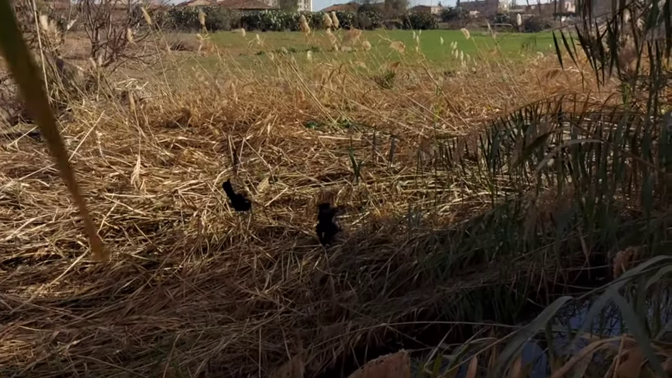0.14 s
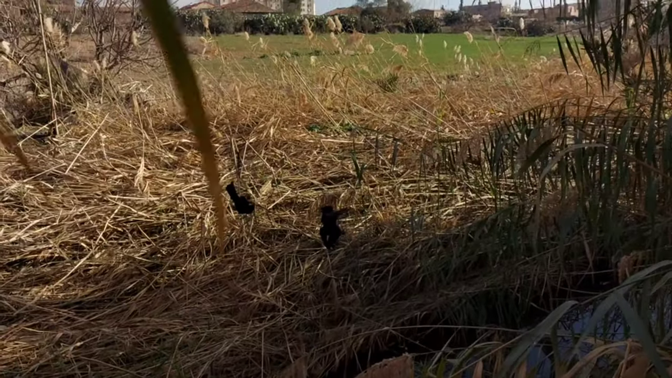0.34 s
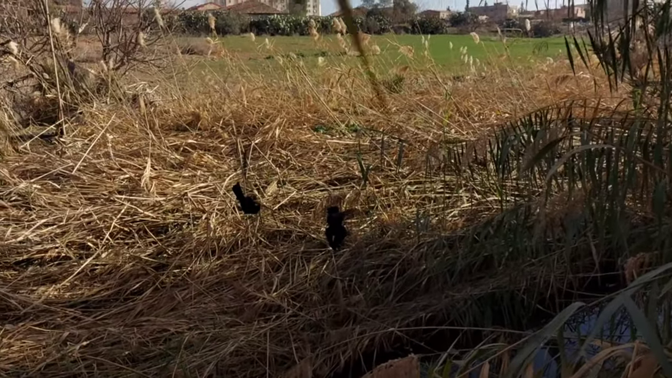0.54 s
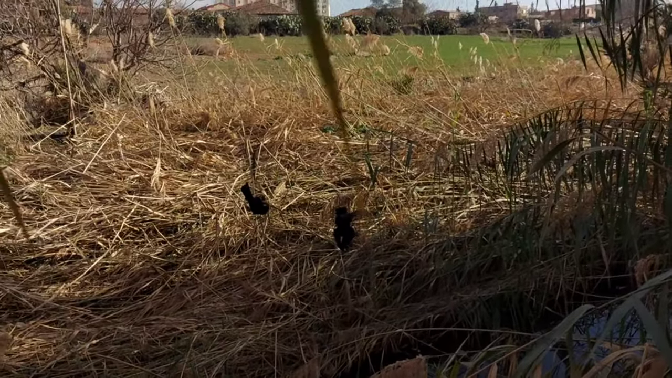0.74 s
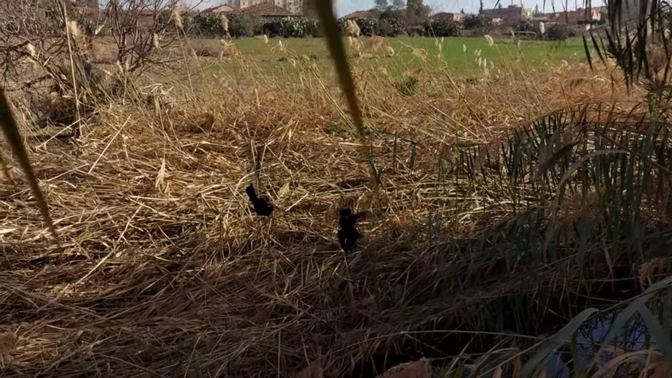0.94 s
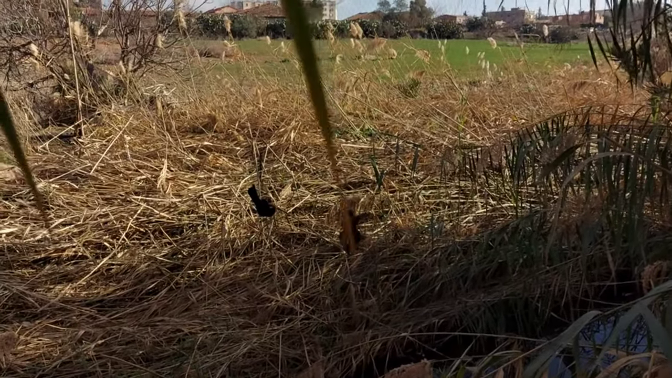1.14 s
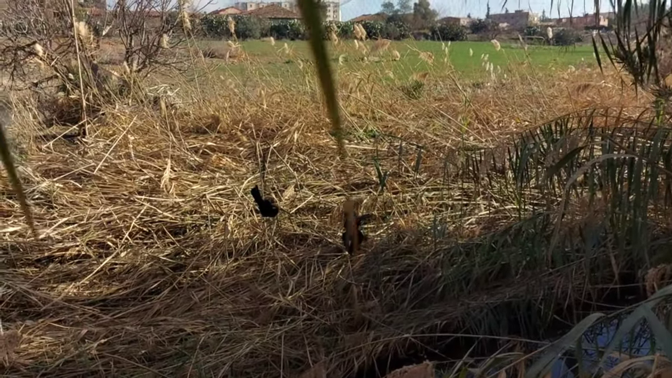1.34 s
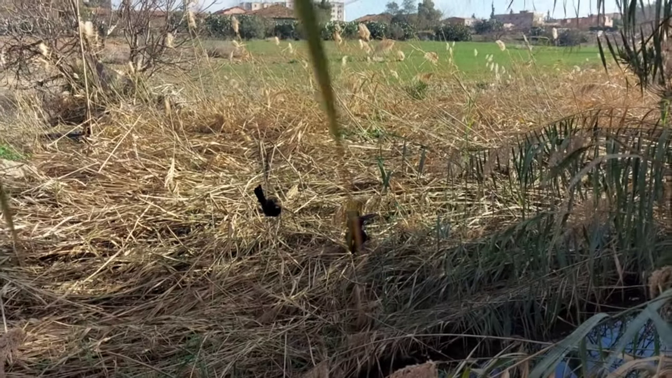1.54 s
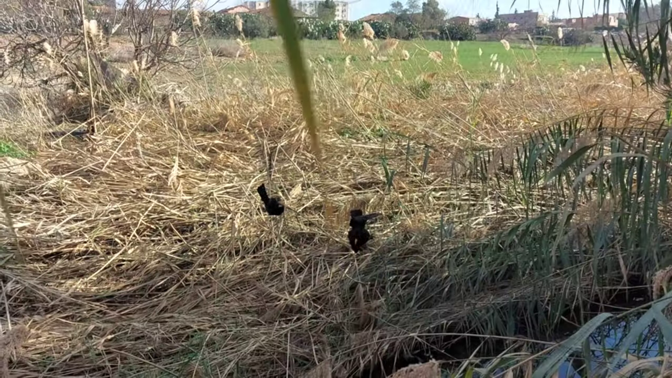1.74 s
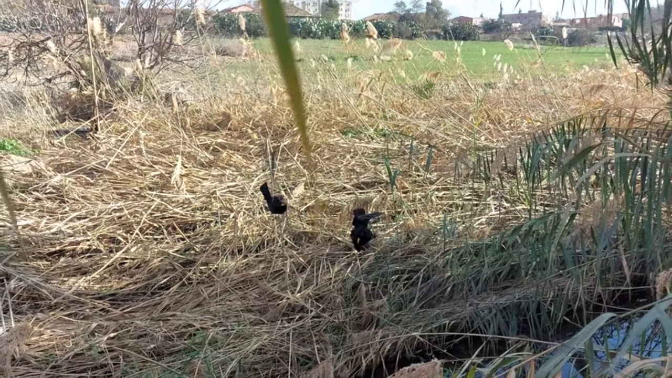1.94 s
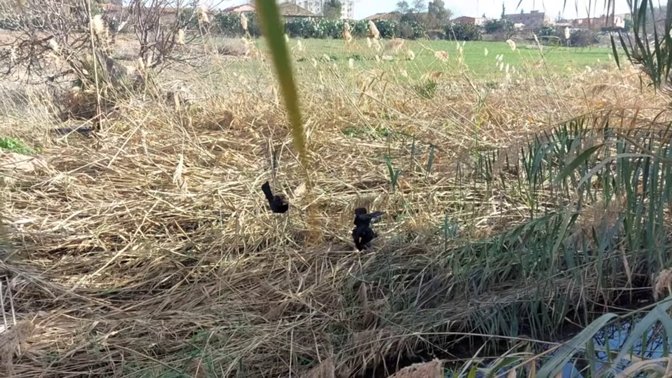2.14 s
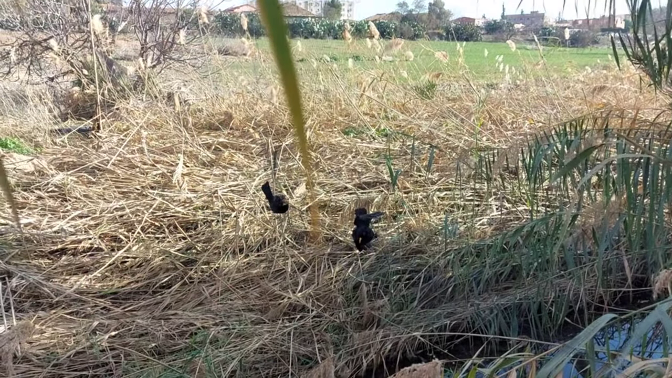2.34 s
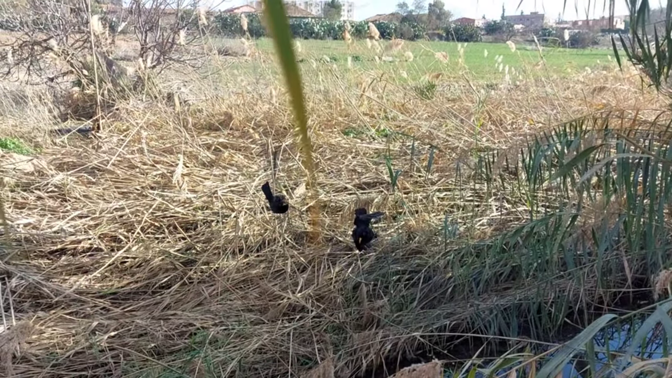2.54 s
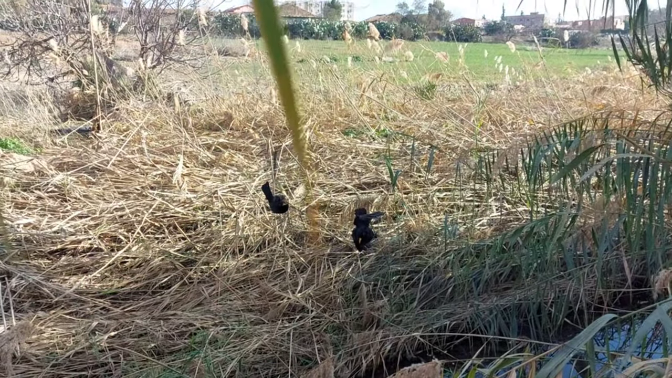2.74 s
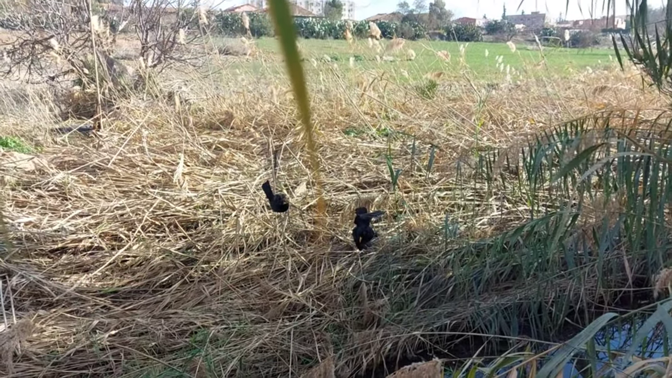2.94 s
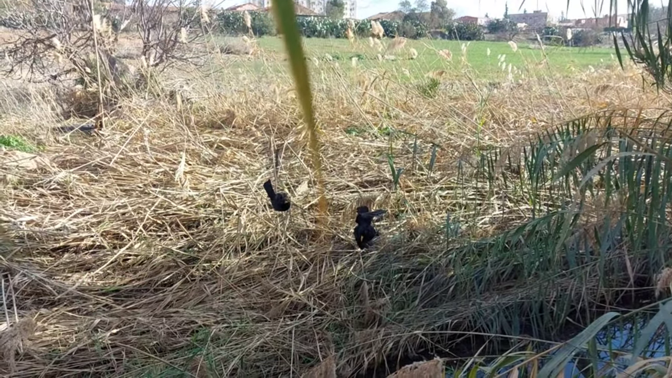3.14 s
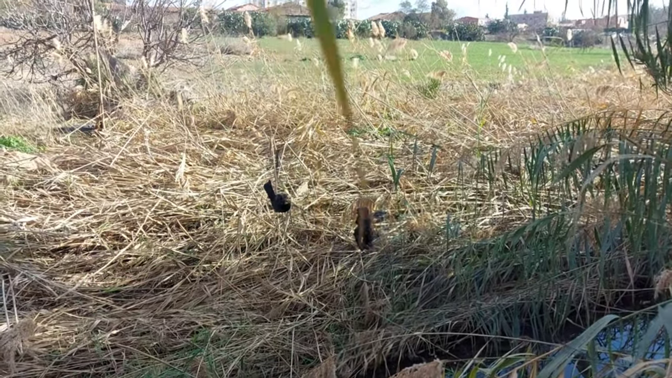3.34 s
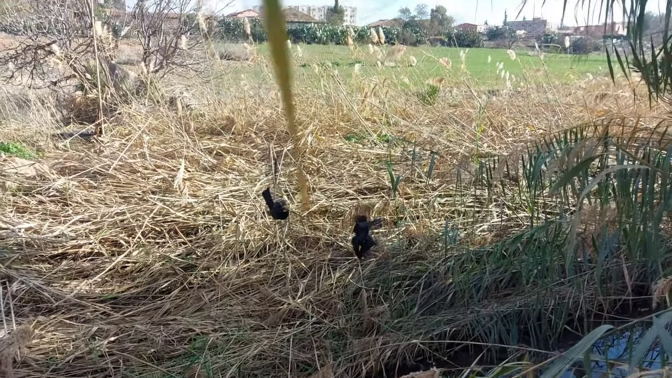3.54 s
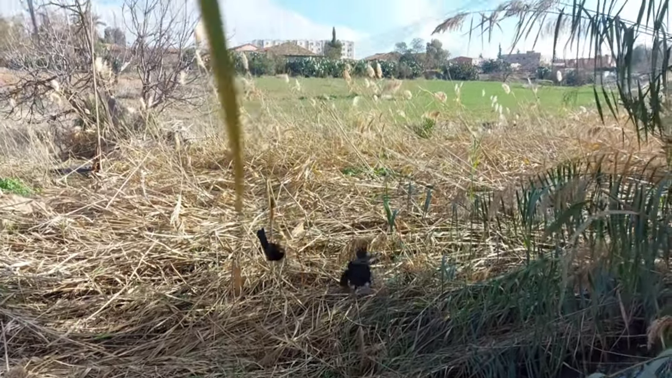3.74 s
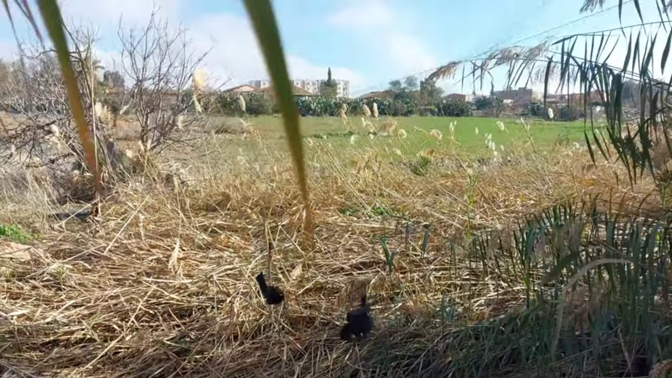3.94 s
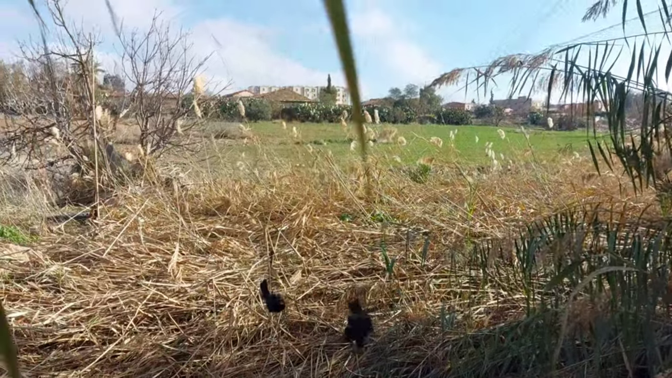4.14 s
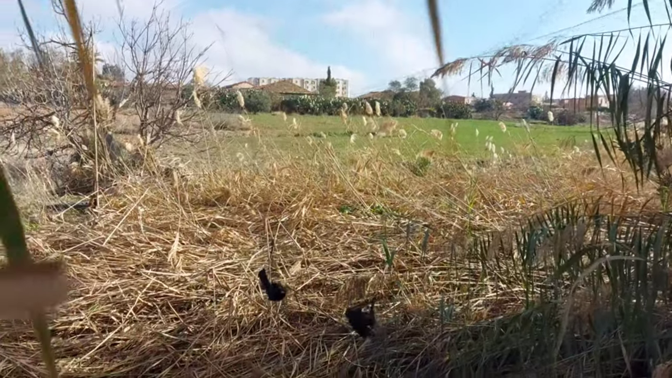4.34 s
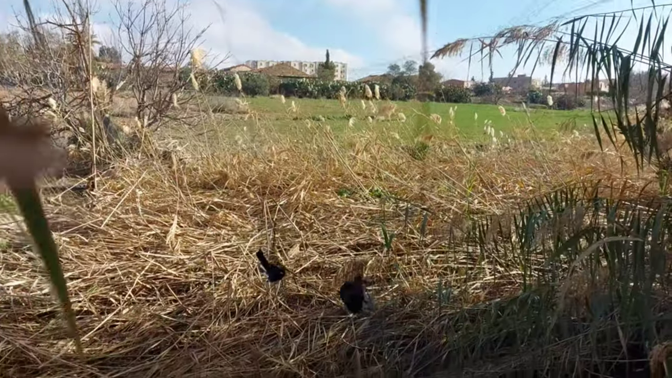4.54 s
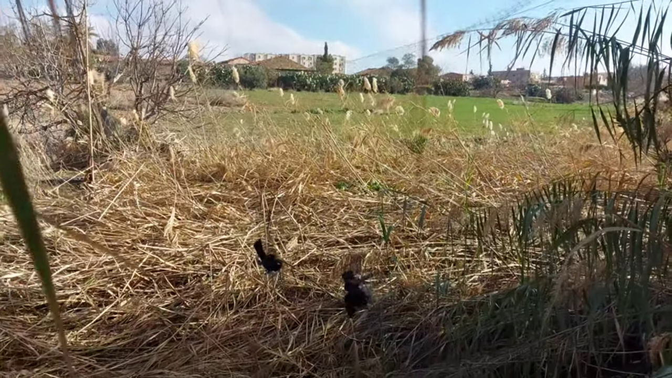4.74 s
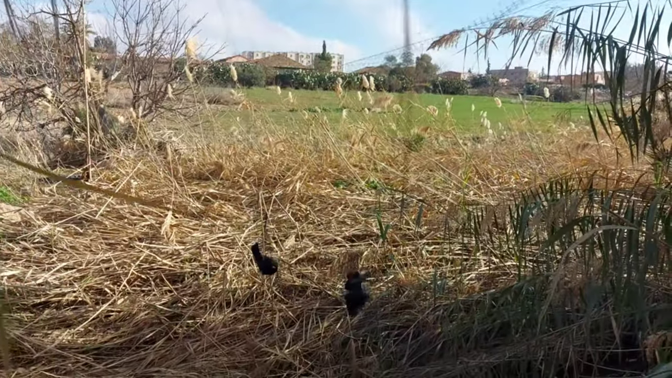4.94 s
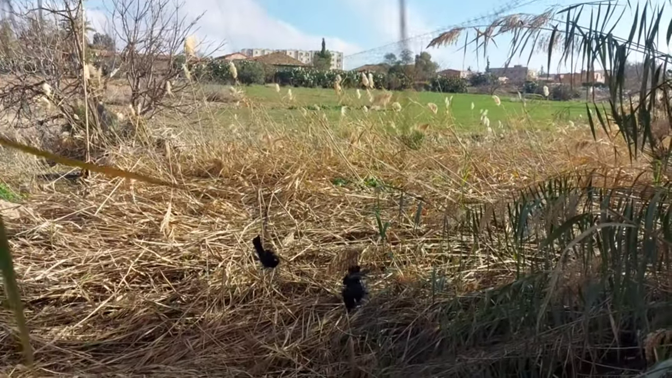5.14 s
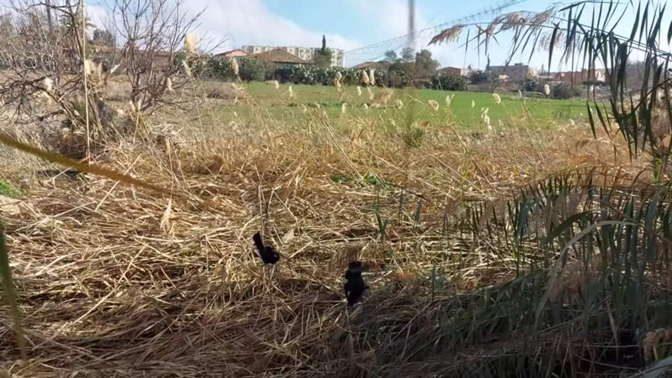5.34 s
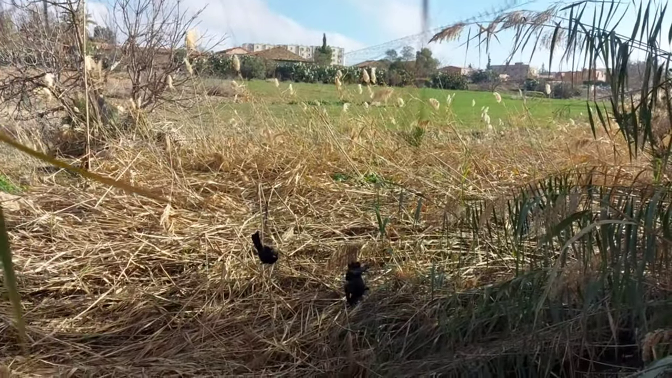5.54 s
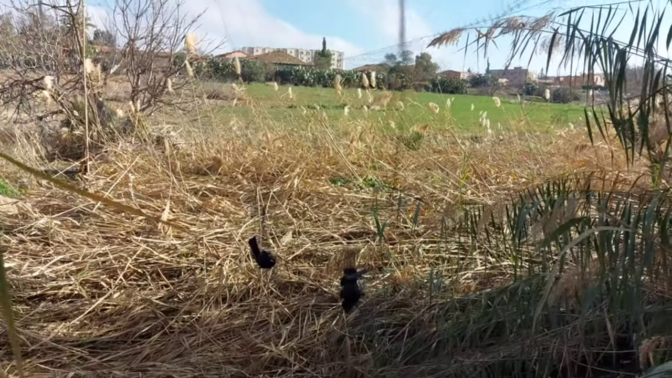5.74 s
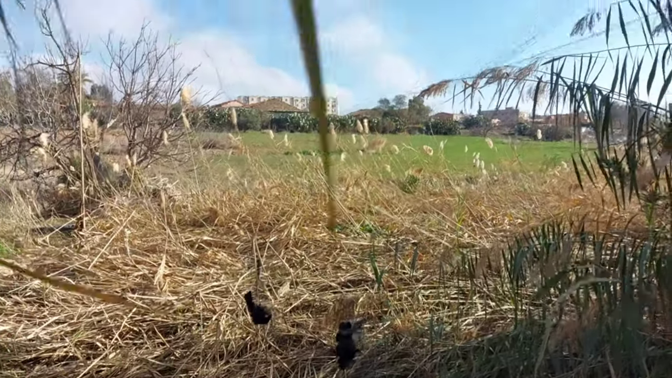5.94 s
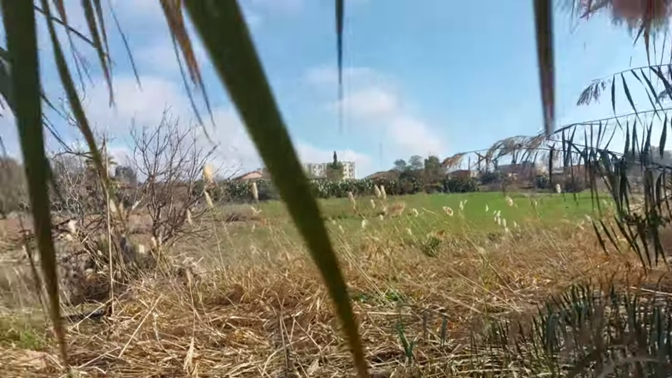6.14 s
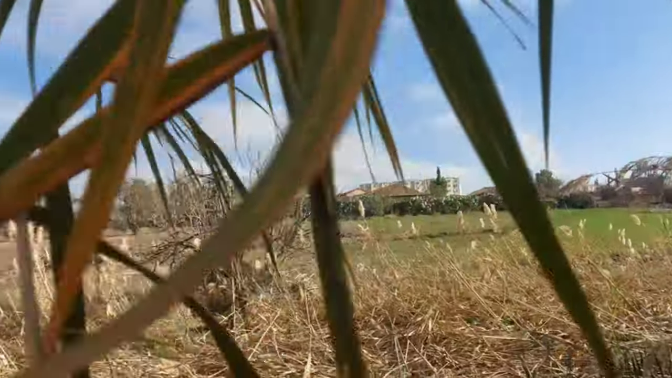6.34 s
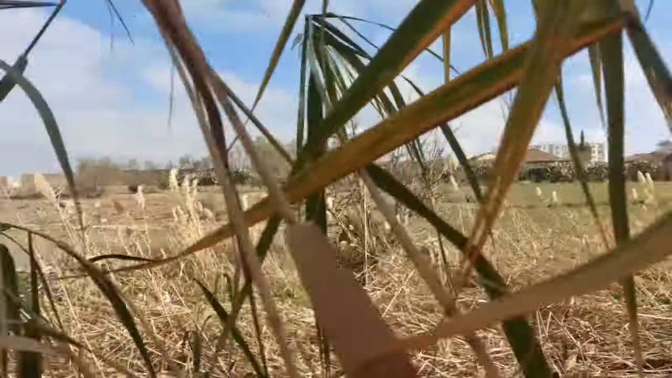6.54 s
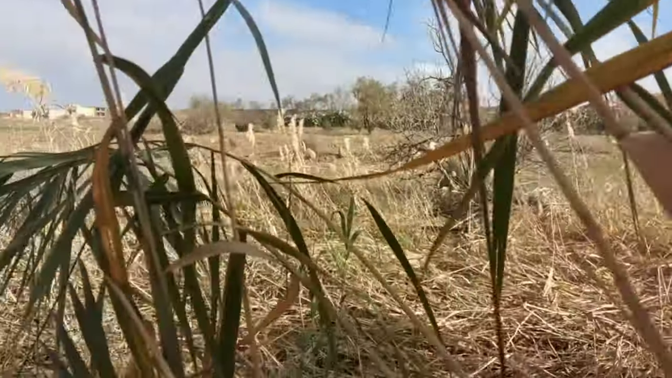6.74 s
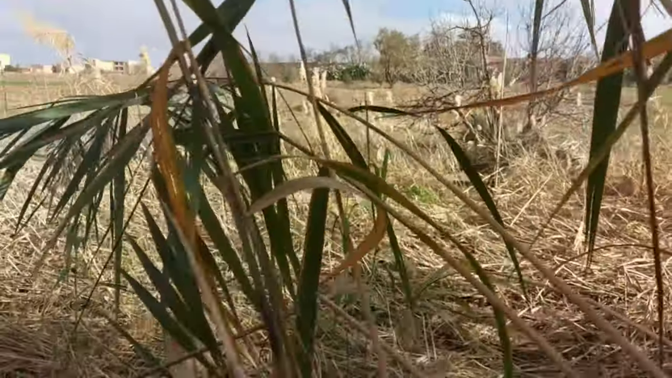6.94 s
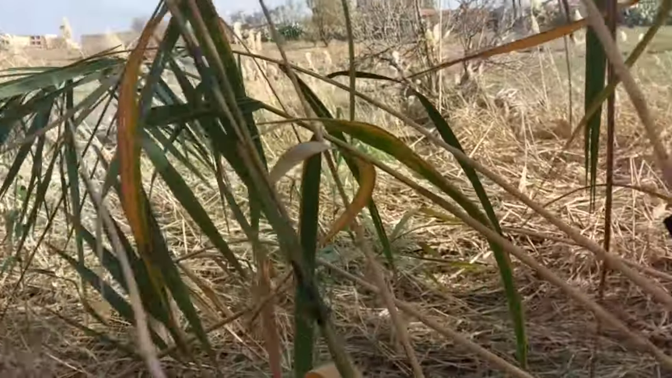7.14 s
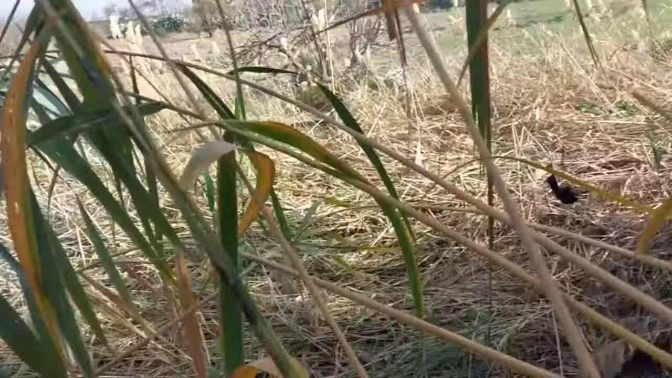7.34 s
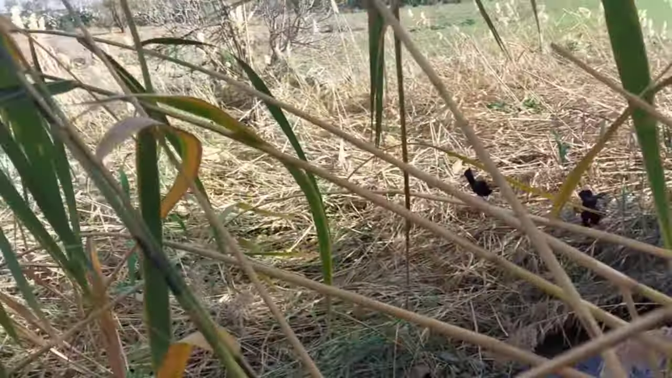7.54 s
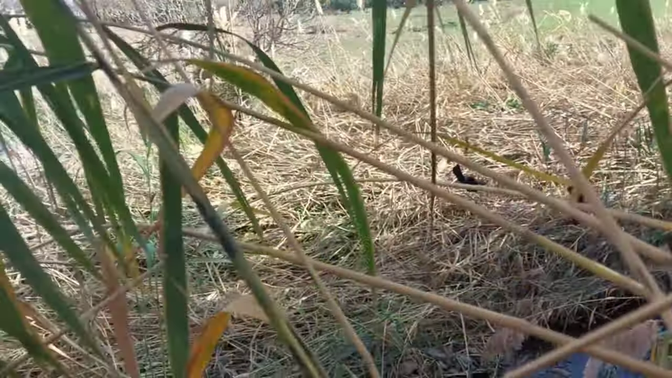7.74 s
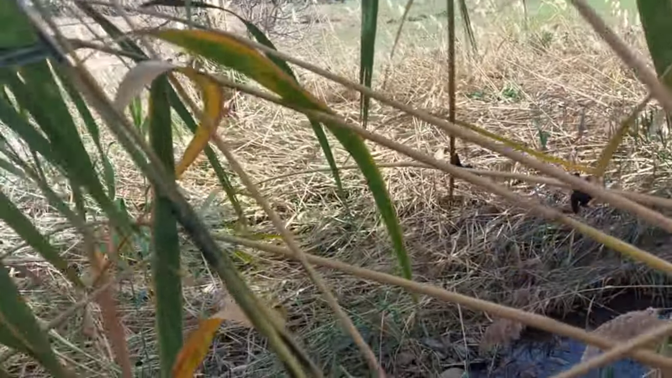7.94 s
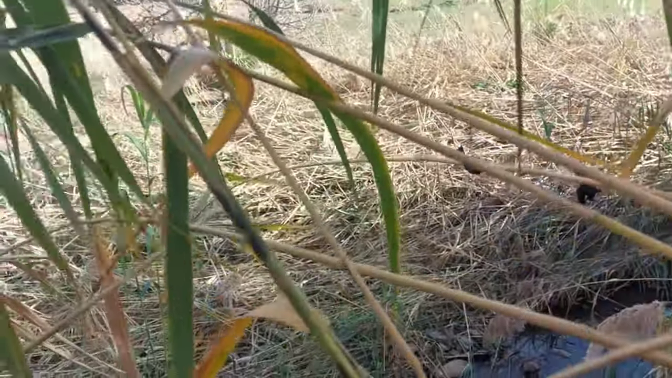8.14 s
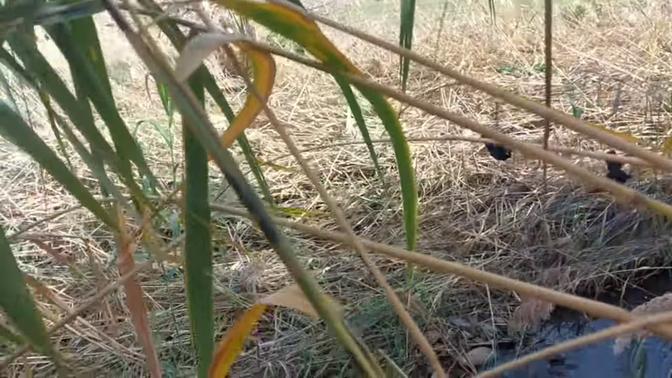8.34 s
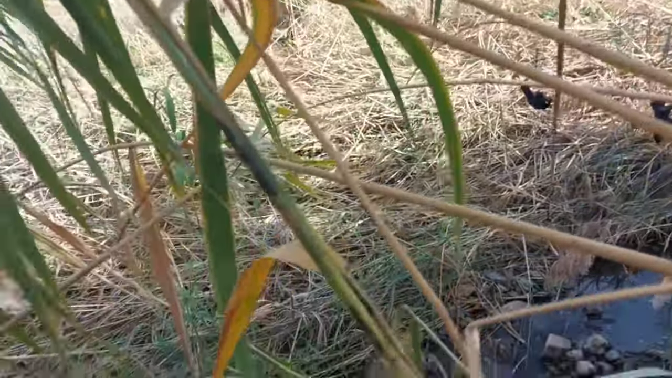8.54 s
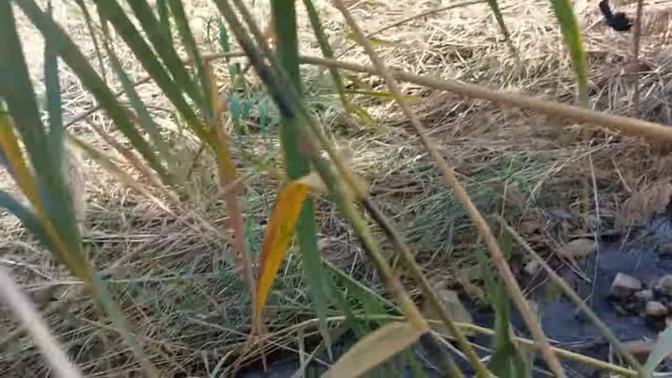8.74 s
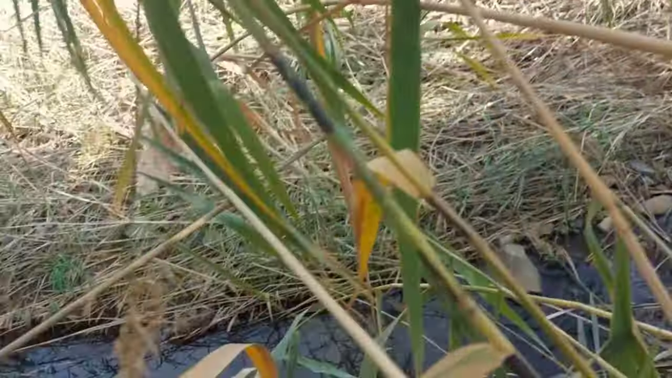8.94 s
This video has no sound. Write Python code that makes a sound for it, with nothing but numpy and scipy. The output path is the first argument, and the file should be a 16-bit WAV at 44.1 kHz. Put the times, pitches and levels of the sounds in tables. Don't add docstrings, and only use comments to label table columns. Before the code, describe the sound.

Someone pushes through dry reeds right beside the microphones: crisp blades, cracking stems. After under a second it thins to sparse snaps over soft low hum and distant country hush. Thin chirps come at about two seconds, then a moderate rustle with quick rising clucks and squeaks near four, and dim twittering after. From six and a half seconds the brushing grows loud, bright and woody, with many breaking stalks, ending abruptly in the thick of it.

```python
import sys
import numpy as np
from scipy import signal
from scipy.io import wavfile
from scipy.ndimage import uniform_filter1d

SR = 44100
rng = np.random.default_rng(int(sys.argv[2]) if len(sys.argv) > 2 else 0)


def master_out(mix):
    frames = np.transpose(np.atleast_2d(mix))
    ceiling = np.clip(frames, -1, 1)
    pcm = np.round(ceiling * 32767).astype(np.int16)
    wavfile.write(sys.argv[1], SR, pcm)


def to_linear_factor(level_db):
    exponent = np.asarray(level_db, float) / 20
    return 10 ** exponent


N = 400428

# time [s], effort [dB], left minus right [dB].
PUSHING = [(0.0, -50, -5.5), (0.16, -28.5, 2), (0.38, -54, 0), (0.839, -58, -1), (1.7, -66.5, -2),
           (2.76, -71.5, -3), (3.1, -65.5, -0.5), (3.64, -41.5, -1), (4.15, -38, -2), (4.78, -59.5, -2),
           (5.36, -65, 0.5), (6.02, -66.5, -3.5), (6.5, -38.5, -2.5), (6.93, -27.5, -2.5),
           (7.42, -28.5, -5), (8.27, -42.5, -5), (8.52, -41, -5), (9.08, -35, -4)]
# peak [s], level [dB], rise [s], fall [s], both over 20 dB, woody scrape [dB].
FLICKS = [(0.272, -22, 0.056, 0.0468, 9), (0.303, -22.5, .06, 0.0329, 5), (0.37, -41.5, 0.087, .2, 0),
          (0.07, -40.5, 0.14, 0.06, 2), (0.21, -34, 0.09, 0.0954, 7), (0.6, -39, 0.23, 0.36, 2.5),
          (0.73, -39.5, 0.23, 0.06, 1.5), (1.25, -52.5, .25, 0.64, 2.5), (1.46, -59, .3, .1, 0),
          (1.86, -58, .1, 0.18, -2), (8.33, -46, .15, 1, 7), (3.115, -53, .012, 0.2, -7),
          (3.145, -54, .05, .03, -5), (4.4, -44, .12, 0.28, 6.5), (4.13, -42, 0.11, 0.2, 11),
          (4.7, -50, .06, .1, 0.5), (7.13, -32, .1, 0.5, -5), (4.59, -51, .03, .06, 5),
          (4.94, -57, .08, .15, 9), (6.18, -50.5, .08, 0.7, 2), (6.12, -46, .04, 0.2, -3),
          (7.36, -30.5, 0.2, 0.1, 9), (7.74, -35, 0.13, 0.3, 5), (7.93, -27, .015, 0.08, 2.5),
          (4.64, -42.5, .04, .06, 9), (4.9, -54.5, 0.038, 0.37, -1), (4.72, -52, .2, .08, 1),
          (5.12, -53, .05, 0.2, -1), (5.185, -50.5, 0.032, .15, -3.5), (5.285, -57, .15, .05, -3),
          (5.61, -50.5, 0.092, .12, -2), (5.68, -52.5, .2, .04, -6), (5.79, -57, .03, 0.2, -4),
          (6.12, -49, 0.066, 0.5, -4), (6.3, -43.5, 0.11, 0.1, 0.5), (7.868, -24.5, 0.032, 0.05, 3),
          (8.05, -32, 0.68, 0.36, -1), (8.6, -32, 0.077, 0.1, -3), (8.68, -25.5, 0.15, 0.35, -3),
          (8.85, -21.5, 0.41, 0.26, 0)]
# frequency [Hz], level [dB per Hz].
REED_COLOUR = [(88, -9.5), (150, -16), (235, -13), (309, -12), (1040, -11.5), (2270, -2), (4080, 0.5),
               (5360, -3.5), (8400, -1.5), (9630, -8.5), (11700, -4), (14500, -1.5), (16000, -5)]
# frequency [Hz], level [dB].
PORT_FACING = [(300, 2.5), (1000, 4), (2400, -3.5), (6000, 1.5), (9000, -3.5), (14000, -2)]
# from [s], to [s], from [Hz], to [Hz], width [Hz], depth [share].
ECHO_DIP = (0.12, 0.315, 2950, 3450, 420, 1.05)
# time [s], level [dB].
HUM_LEVEL = [(0.0, -43), (0.07, -38), (0.88, -51), (1.09, -38.5), (1.72, -42), (4.55, -45.5), (4.68, -56),
             (4.88, -36.5), (4.99, -47.5), (5.6, -41.5), (5.69, -62), (5.87, -35), (6.07, -48), (6.2, -40),
             (6.9, -39.5), (7.4, -52.5), (8.98, -49), (9.08, -56)]
# frequency [Hz], level [dB per Hz].
HUSH_COLOUR = [(12, -44), (30, -10), (70, -3), (91, -9.5), (123, -14.5), (198, -25), (285, -22.5),
               (527, -32.5), (1330, -31), (1960, -34), (5080, -57), (14300, -59.5), (16000, -42)]
# frequency [Hz], left-right correlation [-1 to 1].
LIKENESS = [(60, 0.82), (240, 0.89), (950, -0.12), (3770, -0.16), (15000, -0.049)]
# frequency [Hz], width [Hz], level [dB].
PORT_RINGS = [(2020, 150, 8.5), (9500, 500, -5.)]
# time [s], peak [dB], hollow body [dB], left minus right [dB].
SNAPS = [(1.156, -45, 0, -2), (1.1907, -46, 1, -2), (1.2101, -37, -19, -1), (1.25, -38, -4, 1),
         (1.6631, -45, -14, -6), (1.9669, -46, -16, -4), (1.993, -44, -20, -3), (2.0742, -43, -1, -4),
         (2.2947, -45, -15, -11), (2.4385, -41.5, -8, -8), (2.565, -53, -12, -6), (2.692, -52, -12, -6),
         (2.6204, -47, -7, -9), (2.7984, -35.5, -12, -6), (2.8893, -42.5, -9, -10), (2.957, -46, -8, -9),
         (3.055, -48, -12, -4.5), (3.108, -40, -17, 5.5), (3.232, -46, -13, -4.5), (3.259, -42, -10, -2),
         (4.885, -29, -29, 0), (4.914, -37, -14, 0), (5.1058, -43, -14, -5), (5.174, -34, -31, -4),
         (5.472, -39.5, -10, 0), (5.5243, -39, -21, -.4), (5.5603, -37, -14, -3), (5.597, -34, -6, -1),
         (5.787, -45, -12, 1), (0.9226, -45, -10, -4), (1.0508, -44, -10, -5), (1.124, -47, -8, -4),
         (1.5382, -51, -9, -2), (1.7377, -46, -9, -3), (1.7916, -46.5, -6, -6), (1.8484, -47, -8, 0),
         (2.0295, -48, -8, -5), (4.186, -36, -3, -3), (2.4241, -55, -12, -6), (2.8452, -50, -11.5, -9),
         (3.2877, -43, -10, -1), (4.3463, -32, -7, -4), (4.634, -30.5, -10, -5), (4.9589, -45, -6, -3),
         (5.2567, -44, -14, -3), (5.2826, -42, -14, -2), (4.085, -38, 6, -3), (5.9192, -53, -10, -2),
         (3.141, -40, -17, 0)]
# time [s], peak [dB], hollow body [dB], left minus right [dB].
CRACKS = [(0.1504, -26, -23, 8), (0.1895, -13.5, -8.5, 4), (0.2515, -24, -8, 3), (0.2687, -24, -14, -12),
          (0.2834, -26, -26, -6), (0.297, -24, -16, 1), (0.31, -16, -22, -4), (0.691, -26.5, -25, -6),
          (0.738, -27, -22, -6), (6.107, -39, -22, -7), (6.1235, -34, -14, -10), (6.3087, -32, -8, -6),
          (6.8334, -27, -22, -1), (6.9466, -14, -20, -4.5), (7.044, -22, -20, -3), (7.286, -10, -4.5, -2),
          (7.399, -16, -6, 2), (7.4393, -12.5, 2, -6.5), (7.4944, -25, -19, -1), (7.684, -22, -8, -6.5),
          (8.752, -18, 0, -4), (7.864, -16, -8, -8), (7.875, -12, -5.5, -10), (7.9247, -11.5, 0.5, -7),
          (8.657, -21, 3, -7), (8.7295, -13.5, -0.5, -5), (8.872, -17, -10, -1), (8.8822, -8, -2.5, -6),
          (8.929, -19, -2, -2), (8.966, -16.5, -14, -5), (0.209, -27, -12, 3), (0.358, -32, -14, 0),
          (0.379, -34, -14, 0), (0.457, -41, -14, 0), (0.712, -33, -20, -7), (6.555, -32, 1, -3),
          (7.185, -17, -12, -5), (7.229, -18, -4, -7), (7.295, -22, -12, -4), (7.725, -28, 0, -6),
          (7.852, -20.5, -12, -8), (8.0726, -22, -13, -7), (8.422, -27, -8, -6), (8.837, -15, -8, -10),
          (8.998, -26, -8, -8), (7.017, -23, -3, -4), (7.052, -21, -18, -2), (7.065, -21, -12, -4),
          (8.963, -16, -16, -5), (8.844, -18, -14, -6)]
# time [s], peak [dB], pitch [Hz], t60 [s],
# left minus right [dB].
KNOCKS = [(7.441, -23.5, 70, 0.076, -28), (7.44, -22, 360, 0.0078, -23.5), (8.194, -35, 185, 0.06, -4),
          (8.194, -36, 340, 0.09, -5), (8.214, -39, 225, 0.06, -4), (8.216, -41, 354, 0.056, -4),
          (4.47, -44.5, 560, .12, -2), (4.5, -47, 430, .1, -2), (1.17, -50, 480, .15, -1),
          (0.49, -47, 500, .12, 0), (0.298, -35, 600, 0.056, 0), (4.452, -36, 2400, 0.044, -2)]
# time [s], peak [dB], pitch [Hz], t60 [s], left minus right [dB].
HOOTS = [
    (5.045, -43, 540, 0.2, 4),
    (2.27, -42, 780, 0.17, 0),
]
# from [s], to [s], jerks [per s], ring [Hz].
CREAK = (3.255, 3.37, 330, 5300)
# start [s], length [s], from [Hz], to [Hz], level [dB].
CHIRPS = [(1.472, .016, 1870, 2270, -47), (1.487, 0.015, 2300, 3900, -41.5),
          (1.81, 0.0097, 2710, 2910, -41), (1.822, 0.019, 3100, 2400, -40),
          (1.833, 0.034, 2404, 2910, -37.5), (1.869, 0.022, 2720, 2730, -47),
          (2.039, 0.015, 1690, 2320, -47.5), (2.051, .012, 1950, 2300, -44),
          (2.057, 0.019, 2400, 2700, -38), (2.072, .02, 2650, 2610, -48), (2.138, .04, 3380, 3050, -43),
          (2.275, 0.047, 2950, 2800, -41), (2.165, .045, 3200, 3060, -41.5), (2.22, .012, 3150, 3100, -50),
          (2.241, 0.029, 2810, 2960, -37.5), (2.278, 0.043, 2900, 2000, -40),
          (2.165, .007, 2950, 2100, -47), (2.182, 0.0056, 2100, 2900, -49), (2.285, .03, 2500, 2350, -44)]
# time of top pitch [s], top [Hz], resting [Hz], level [dB].
CLUCKS = [
    (3.793, 2220, 980, -37.5),
    (3.922, 2435, 1052, -33.5),
    (4.065, 2500, 1000, -36.5),
    (4.191, 2483, 1252, -33.5),
    (4.353, 2800, 1334, -31),
]
# start [s], length [s], from [Hz],
# to [Hz], level [dB].
SQUEAKS = [
    (4.451, 0.022, 1400, 1800, -40.5),
    (4.472, .007, 1600, 1350, -47),
    (4.584, 0.012, 2150, 1700, -46),
    (4.496, .006, 1700, 1600, -50),
    (4.621, 0.031, 1292, 2664, -41),
    (4.353, .016, 4300, 2600, -43),
    (4.366, 0.023, 2200, 2500, -45),
    (4.638, .012, 3100, 5600, -45),
]
# start [s], length [s], from [Hz], to [Hz], level [dB].
TWITTER = [(4.919, 0.017, 4250, 4020, -55), (4.982, .014, 4300, 4950, -52), (5.6, .012, 5100, 4100, -55),
           (5.078, .016, 3600, 3900, -56), (4.972, 0.018, 3130, 4690, -56), (4.988, 0.014, 4550, 3600, -52),
           (5.0, .014, 3600, 3200, -59), (5.086, 0.0074, 4400, 3400, -55), (5.001, 0.023, 4800, 4360, -46),
           (5.023, .01, 4100, 4430, -50), (5.036, 0.025, 3250, 4000, -55), (5.052, 0.018, 3900, 3210, -52),
           (5.064, 0.018, 4450, 3580, -51), (5.676, 0.016, 5550, 4900, -54), (5.69, 0.012, 4450, 4200, -54),
           (5.7, .016, 4050, 4450, -60), (5.575, .035, 3900, 4900, -65), (5.72, .03, 3100, 4000, -65),
           (5.69, 0.05, 4950, 5000, -63), (5.69, .06, 5450, 5400, -64), (5.736, 0.014, 3350, 3300, -62),
           (5.752, .014, 3450, 3150, -59), (5.73, .05, 3950, 3700, -65), (5.77, .04, 5100, 4900, -70)]

SPACING = 21
STEM_DB, LITTER_DB = -8.5, -18
STEM_SHARE, LITTER_SHARE = 0.86, 0.62
TIP_DB, TIP_DB_PER_PAN, TIP_PAN = -3.6, -0.78, 1.2
HUSH_DB = -60
STEM_HZ, STEM_SPREAD = 3760, 0.271
SNAP_RISE_S, SNAP_T60 = .005, .017
CRACK_RISE_S, CRACK_T60 = .0015, .011
KNOCK_RISE, HOOT_RISE = 0.087, 0.26
LEAP_S, SINK_S, TAIL_S, FADE_DB = .009, .006, .025, -14.5


def evened(x):
    return x / np.sqrt(np.mean(x ** 2) + 1e-20)


def read(points, hz):
    f, value = np.transpose(points)
    return np.interp(np.log(hz + 1), np.log(f + 1), value)


def add(mix, s, sound, pan_db, lag):
    for ear, side in zip(mix, (1, -1)):
        part = ear[round(s * SR + max(-side * lag, 0)):][:len(sound)]
        part += to_linear_factor(side * pan_db / 2) * sound[:len(part)]


def lowpass(hz):
    return signal.butter(2, hz, fs=SR, output="sos")


def band(x, lo_hz, hi_hz):
    return signal.sosfilt(signal.butter(2, [lo_hz, hi_hz], "bandpass", fs=SR, output="sos"), x)


def split(x, low_hz, high_hz):
    low, below = (signal.sosfiltfilt(lowpass(hz), x) for hz in (low_hz, high_hz))
    return low, below - low, x - below


def causal(points):
    hz = abs(np.fft.fftfreq(4096, 1 / SR))
    log_gain = np.log(to_linear_factor(np.maximum(read(points, hz), -100)))
    return np.fft.ifft(np.exp(np.conj(signal.hilbert(log_gain)))).real[:1024]


def drift(rate_hz):
    return evened(signal.sosfilt(lowpass(rate_hz), rng.standard_normal(N)))


def patchy(noise, across_hz, across_time):
    return evened(uniform_filter1d(uniform_filter1d(noise, size=across_hz, axis=0), size=across_time, axis=1))


def ring(hz, t60, size=3000):
    t = np.arange(size) / SR
    return to_linear_factor(-60 * t / t60) * np.sin(2 * np.pi * hz * t)


def effort():
    t = np.linspace(0, N / SR, num=6000)
    s, db, pan_db = np.transpose(PUSHING)
    power, wood = to_linear_factor(2 * np.interp(t, s, db)), 0
    for peak, flick_db, rise, fall, wood_db in FLICKS:
        flick = to_linear_factor(2 * (flick_db - 20 * np.maximum((peak - t) / rise, (t - peak) / fall)))
        power = power + flick
        wood = wood + wood_db * flick
    curves = (10 * np.log10(power), wood / power, np.interp(t, s, pan_db))
    return (np.interp(np.arange(N) / SR, t, curve) for curve in curves)


def crackle(per_s, spread_db, count=12):
    chance = per_s / SR * to_linear_factor(2.8 * drift(35))
    size = to_linear_factor(spread_db * np.minimum(rng.exponential(1, N), 3.8))
    size = size * (rng.random(N) < chance) * rng.choice([-1, 1], N)
    place, out = rng.integers(0, count, N), np.zeros((2, N))
    splinter_fade = to_linear_factor(-60 * np.arange(300) / SR / .002)
    for k, hz in enumerate(np.geomspace(500, 14000, count)):
        grain = .7 * evened(ring(hz, 4.0 / hz, size=300)) / np.sqrt(300)
        grain += .15 * rng.standard_normal(300) * splinter_fade
        grain[0] += 1
        clicks = signal.oaconvolve(size * (place == k), grain)[:N]
        add(out, 0, clicks, rng.normal(0, 3.5), rng.integers(-SPACING, SPACING))
    return evened(out)


def swish():
    z = signal.stft(rng.standard_normal((2, N)), nperseg=256)[2]
    patches = patchy(rng.standard_normal(z.shape[1:]), 9, 12)
    wash = signal.istft(z * to_linear_factor(2.0 * patches), nperseg=256)[1][:, :N]
    return evened(wash * to_linear_factor(1.2 * drift(25) + .4 * drift(6.0)))


def reeds():
    blade_db, wood_db, pan_db = effort()
    excess_db = blade_db + 35
    stem_db = STEM_DB + wood_db + (STEM_SHARE - 1) * excess_db
    litter_db = LITTER_DB + (LITTER_SHARE - 1) * excess_db
    rub = to_linear_factor(-4.5) * crackle(1500, 3.0) + swish()
    rub = signal.oaconvolve(rub, causal(REED_COLOUR)[None])[:, :N]
    litter, stems, blades = split(rub, 1820, 7540)
    litter = litter + 0.14 * litter[::-1]
    leaves, tips = split(blades, 200, 11600)[1:]
    tip_db = TIP_DB + TIP_DB_PER_PAN * np.minimum(pan_db, -1) + .6 * drift(14)
    tip_db = tip_db + np.outer([TIP_PAN, -TIP_PAN], 1)
    blades = leaves + tips * to_linear_factor(tip_db)[::-1]
    rub = evened(blades) + to_linear_factor(stem_db) * evened(stems) + to_linear_factor(litter_db) * evened(litter)
    rub[0] = signal.oaconvolve(rub[0], causal(PORT_FACING))[:N]
    return to_linear_factor(blade_db + 1.37) * rub * to_linear_factor(np.outer([.5, -.5], pan_db))


def dipped(x):
    start, end, from_hz, to_hz, width, depth = ECHO_DIP
    at = slice(round(start * SR), round(end * SR))
    u = np.linspace(0, 1, num=at.stop - at.start)
    turn = np.exp(2j * np.pi * np.cumsum(from_hz + (to_hz - from_hz) * u) / SR)
    smooth = np.hanning(round(SR / width))[None]
    slow = signal.fftconvolve(x[:, at] / turn, smooth / smooth.sum(), "same", axes=1)
    swell = depth * np.sqrt(u) * np.minimum(20 * (1 - u), 1)
    echo = np.zeros_like(x)
    echo[:, at] = swell * 2 * (turn * slow).real
    return x - echo


def hum():
    s, db = np.transpose(HUM_LEVEL)
    turn = 2 * np.pi * np.cumsum(69.5 + 2.8 * drift(2.5)) / SR
    beside = 2 * np.pi * np.cumsum(57.0 + 1.72 * drift(1.04)) / SR
    tone = np.sin(turn) * (1 + 0.39 * drift(10.7)) + 0.33 * np.sin(beside) + 0.028 * np.sin(2 * turn)
    tone += 0.21 * evened(band(rng.standard_normal(N), 43, 82.0))
    tone = to_linear_factor(np.interp(np.arange(N) / SR, s, db)) * evened(tone)
    return np.array([tone, np.roll(tone, SPACING)]) * to_linear_factor([[-.5], [.5]])


def hush():
    hz = np.fft.rfftfreq(1024, 1 / SR)
    a, b, c, d, patches = rng.standard_normal((N // 256 + 5, 513, 5)).T
    patches = patchy(patches, 10, 14)
    same = np.clip(read(LIKENESS, hz), -1, 1)[:, None]
    left = a + 1j * b
    z = np.array([left, same * left + np.sqrt(1 - same ** 2) * (c + 1j * d)])
    port_db = sum(db / (1 + ((hz - f) / width) ** 2) for f, width, db in PORT_RINGS)
    colour = to_linear_factor(read(HUSH_COLOUR, hz) + port_db)
    z *= colour[:, None] * to_linear_factor(2.1 * patches)
    above_hum = np.linalg.norm(colour[3:]) / np.linalg.norm(colour)
    air = evened(signal.istft(z, nperseg=1024, noverlap=768)[1][:, :N])
    return to_linear_factor(HUSH_DB + 2.5) / above_hum * air * to_linear_factor([[-.7], [.7]])


def snaps():
    out, t = np.zeros((2, N + 900)), np.arange(900) / SR
    colour = causal(REED_COLOUR)

    def burst(rise, t60):
        return (1 - to_linear_factor(-60 * t / rise)) * (to_linear_factor(-60 * t / t60) + to_linear_factor(-60 * t / .004))

    soft = burst(SNAP_RISE_S, SNAP_T60) + .17 * to_linear_factor(-60 * t / .1) * np.minimum(t / .003, 1)
    sharp = burst(CRACK_RISE_S, CRACK_T60) + .13 * to_linear_factor(-60 * t / .08)
    for rows, shape in ((SNAPS, soft), (CRACKS, sharp)):
        for s, db, ring_db, pan_db in rows:
            noise = rng.standard_normal((2, 900))
            crack = signal.oaconvolve(noise * shape, colour[None])[:, :900]
            high, low = band(crack, 5000, 16300), band(.5 * crack[0] + crack, 540, 4500)
            stem_hz = STEM_HZ * np.exp(STEM_SPREAD * noise[0, 0])
            low = low / abs(low).max() + 0.35 * ring(stem_hz, 0.0093, size=900)
            sound = high / abs(high).max(axis=1, keepdims=True) + to_linear_factor(ring_db) * low
            out[:, round(s * SR):][:, :900] += to_linear_factor(db + 3 + np.outer([.5, -.5], pan_db)) * sound
    return out[:, :N]


def knocks_and_hoots():
    out, t = np.zeros((2, N)), np.arange(5000) / SR
    for rows, share in ((KNOCKS, KNOCK_RISE), (HOOTS, HOOT_RISE)):
        for s, db, hz, t60, pan_db in rows:
            swell = np.sin(np.pi / 2 * np.minimum(t / (share * t60), 1)) ** 2
            add(out, s, to_linear_factor(db) * ring(hz, t60, size=5000) * swell, pan_db, 0)
    return out


def creak():
    out = np.zeros((2, N))
    start, end, per_s, hz = CREAK
    jerks = rng.standard_normal((40, 3))
    for s, (late, pitch, size) in zip(np.arange(start, end, 1 / per_s), jerks):
        jerk = to_linear_factor(-48.5 + 2.5 * size) * ring(hz * (1 + .09 * pitch), .011, size=900)
        add(out, s + .004 * late, jerk, -2.5, 8)
    return out


def glide(s, length, from_hz, to_hz, db, bend, fade_db):
    u = np.linspace(0, 1, num=24)
    hz = from_hz + (to_hz - from_hz) * u ** bend
    return np.transpose([s + length * u, hz, db + fade_db * (2 * u - .9) ** 2])


def cluck(s, top_hz, rest_hz, db):
    t = np.linspace(-LEAP_S, TAIL_S, num=34)
    lift = np.where(t < 0, 1 + t / LEAP_S, np.exp(-np.maximum(t, 0) / SINK_S))
    fade = np.where(t < 0, 1.1 * (t / LEAP_S) ** 2, (abs(t) / TAIL_S) ** 1.14)
    return np.transpose([s + t, rest_hz + (top_hz - rest_hz) * lift, db + FADE_DB * fade])


def call(rows, overtone, rasp, breath_db):
    s, hz, db = np.transpose(rows)
    t = np.arange(s[0], s[-1], 1 / SR)
    pitch = np.interp(t, s, hz)
    turn = 2 * np.pi * np.cumsum(pitch) / SR
    slow, fast = rng.standard_normal((2, len(t)))
    flow = 1 + rasp * evened(uniform_filter1d(uniform_filter1d(slow, size=70), size=70))
    tone = np.sin(turn) + overtone * np.sin(2 * turn) + overtone ** 2 * np.sin(3 * turn)
    puffs = (1 + np.cos(turn)) * (pitch / hz.mean())
    breath = to_linear_factor(breath_db) * evened(band(fast, 2300, 5600)) * puffs
    voice = flow * np.sqrt(2) * tone + breath
    return s[0], to_linear_factor(np.interp(t, s, db)) * voice * signal.windows.tukey(len(t), .2)


def birds():
    near, mid, far = np.zeros((3, 2, N))
    for row in CHIRPS:
        add(mid, *call(glide(*row, bend=1.1, fade_db=-6), 0.014, 0.4, -31), -1.5, 22)
    for row in CLUCKS:
        s, top_hz, _, db = row
        add(near, *call(cluck(*row), .22, .42, -12), -2.5, lag=1)
        catch = glide(s - .013, .011, 1.08 * top_hz, .85 * top_hz, db - 15, bend=1, fade_db=-3)
        add(near, *call(catch, .1, .8, -8), -2.5, lag=1)
    for row in SQUEAKS:
        add(near, *call(glide(*row, bend=2.5, fade_db=-7), .12, .25, -7), -2.5, lag=1)
    for row in TWITTER:
        add(far, *call(glide(*row, bend=0.915, fade_db=-3.5), .02, 0.45, -15), -1.5, 12)
    t = np.arange(9000) / SR
    tail = rng.standard_normal((2, 9000)) * to_linear_factor(-60 * t / .22) * (t > .004)
    tail /= np.linalg.norm(tail[0])
    t = t[:2000]
    thicket = rng.standard_normal((2, 2000)) * to_linear_factor(-60 * t / 0.1) * (t > .003)
    thicket = .5 * thicket + 1.6 * band(thicket, 1600, 4600)
    thicket /= np.linalg.norm(thicket[0])
    near += to_linear_factor(-13) * signal.oaconvolve(near, thicket, axes=1)[:, :N]
    mid = mid + to_linear_factor(-19) * signal.oaconvolve(mid, thicket[::-1], axes=1)[:, :N]
    far = to_linear_factor(-1.5) * far
    scattered = to_linear_factor(-22) * near + to_linear_factor(-14) * mid + to_linear_factor(-1.5) * far
    return near + mid + far + signal.oaconvolve(scattered, tail, axes=1)[:, :N]


def scene():
    rustle = reeds() + snaps() + knocks_and_hoots() + creak()
    return dipped(rustle) + birds() + hum() + hush()


def top_cut(x):
    return signal.sosfilt(signal.butter(12, 16980, fs=SR, output="sos"), x)


def record(dry):
    edge = signal.firwin(511, [38, 15790], pass_zero=False, window=("kaiser", 4), fs=SR)
    mix = signal.oaconvolve(dry, edge[None], "same")
    return top_cut(mix)


dry = scene()
out = record(dry)
master_out(out)
```